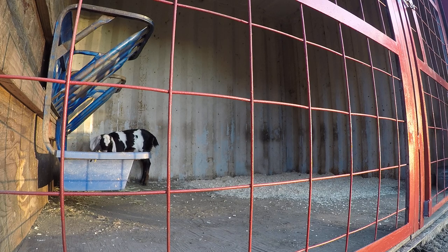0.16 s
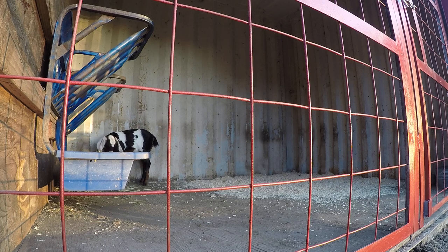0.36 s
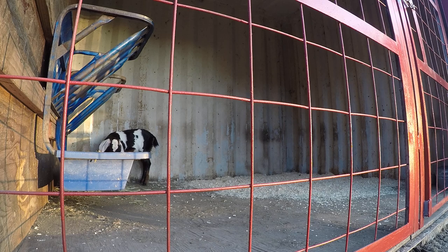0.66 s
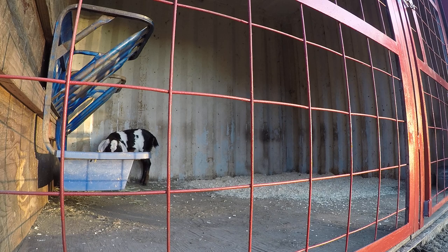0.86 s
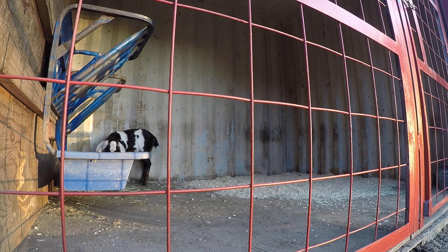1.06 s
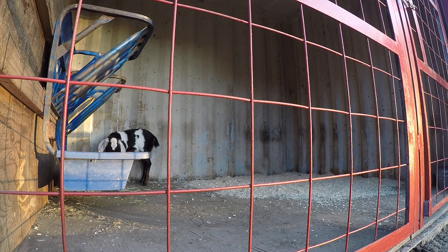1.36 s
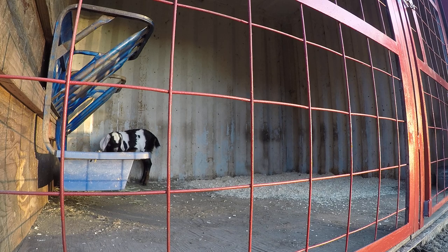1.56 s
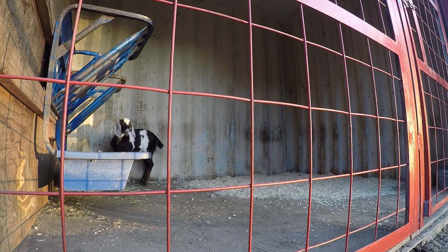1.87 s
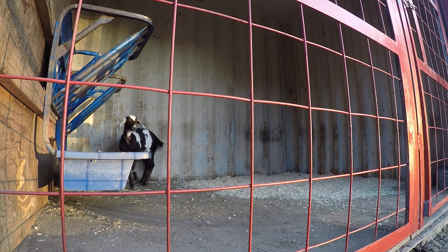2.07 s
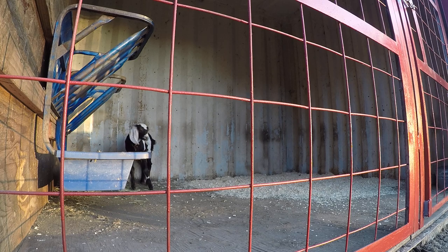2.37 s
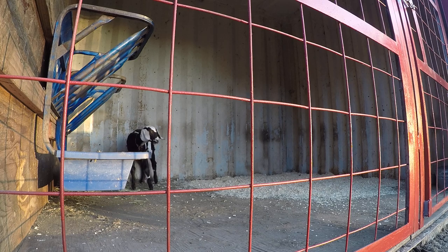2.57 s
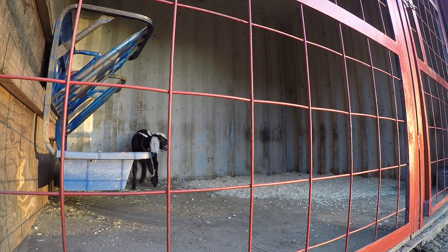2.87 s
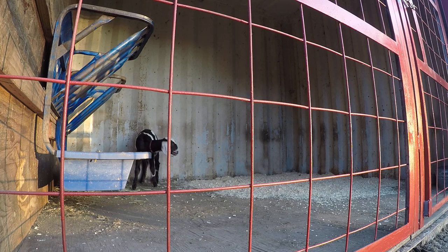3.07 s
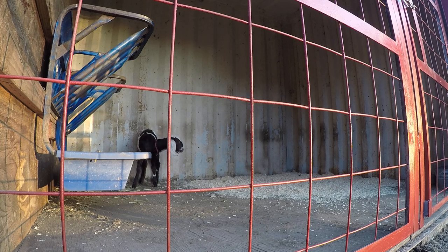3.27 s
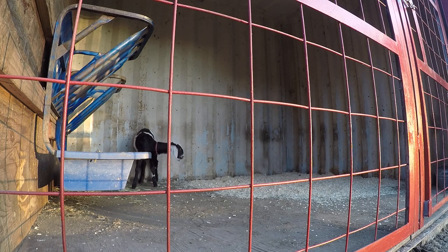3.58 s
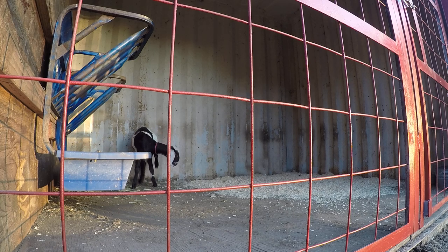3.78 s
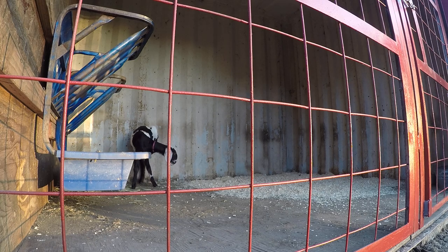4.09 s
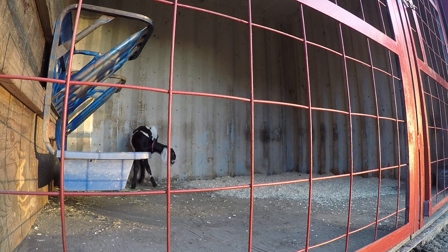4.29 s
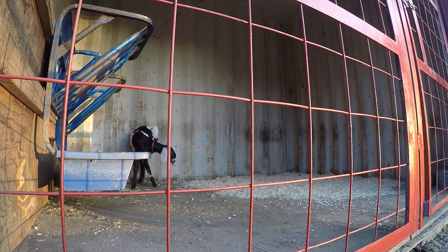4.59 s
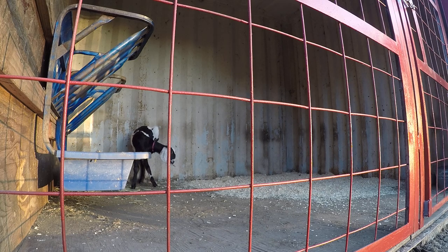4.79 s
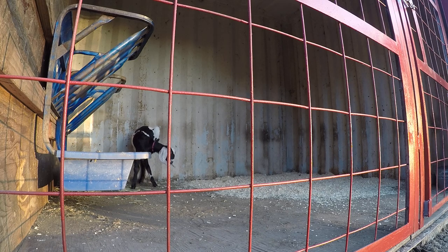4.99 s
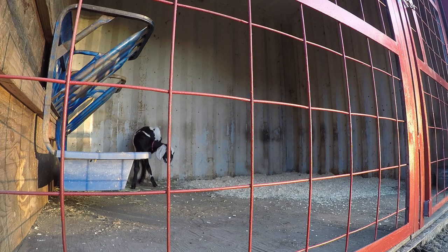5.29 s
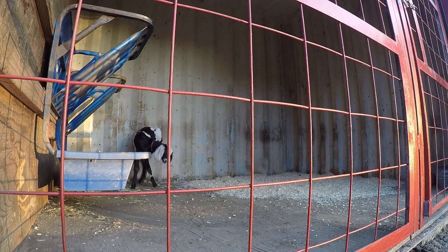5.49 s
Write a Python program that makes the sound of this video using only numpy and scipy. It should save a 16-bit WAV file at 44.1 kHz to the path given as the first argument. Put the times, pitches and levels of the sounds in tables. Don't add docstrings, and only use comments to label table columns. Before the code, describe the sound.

A young goat bleats once, loud and hoarse-ended, in a ringing metal shed after a hollow plastic knock, with faint birds and wind around.

```python
import sys
import numpy as np
from scipy import signal
from scipy.io import wavfile
from scipy.ndimage import uniform_filter1d

SR = 44100
rng = np.random.default_rng(int(sys.argv[2]) if len(sys.argv) > 2 else 0)


def makeup_ratio(level_db):
    decades = np.asarray(level_db, float) / 20
    return 10 ** decades


def wav_record(signal):
    frames = np.transpose(np.atleast_2d(signal))
    bounded = np.clip(frames, -1, 1)
    quanta = np.round(bounded * 32767).astype(np.int16)
    wavfile.write(sys.argv[1], SR, quanta)


N = 249165
T = np.arange(N) / SR


def level(x, db):
    return x * makeup_ratio(db) / np.sqrt(np.mean(x ** 2))


def band(x, lo_hz, hi_hz):
    return signal.sosfilt(signal.butter(2, [lo_hz, min(hi_hz, .45 * SR)], "band", fs=SR, output="sos"), x)


def walk(rate_hz, count=N):
    k = max(int(SR / rate_hz), 1)
    return level(uniform_filter1d(uniform_filter1d(rng.standard_normal(count), k), k), 0)


def tone(hz):
    return np.sin(2 * np.pi * np.cumsum(hz) / SR)


def note(start_s, length_s, attack_s, release_s):
    span = slice(int(start_s * SR), int((start_s + length_s) * SR))
    t = T[span] - start_s
    edge = np.clip(np.minimum(t / attack_s, (length_s - t) / release_s), 0, 1)
    return span, t, np.sin(np.pi / 2 * edge) ** 2


def tail(t60_s, length_s=1.4):
    t = np.arange(int(length_s * SR)) / SR
    x = rng.standard_normal(len(t)) * makeup_ratio(-60 * t / t60_s)
    return x / np.sqrt(np.sum(x ** 2))


def modes_sum(modes, t):
    return sum(makeup_ratio(db - 60 * t / t60_s) * np.sin(2 * np.pi * hz * t) for hz, db, t60_s in modes)


def ring(modes, rise_s):
    t = np.arange(SR // 2) / SR
    x = modes_sum(modes, t) * (1 - np.exp(-(t / rise_s) ** 2))
    return x / np.abs(x).max()


def place(starts_s, db, sound):
    out = np.zeros(N + len(sound))
    for s, gain in zip(starts_s, makeup_ratio(np.asarray(db))):
        first = int(s * SR)
        out[first:first + len(sound)] += gain * sound
    return out[:N]


def kid():
    # start_s, effort_db, opening_0_1
    bleat = [(2.476, -31, 1.), (2.52, -18.5, 0.58), (2.6, -8, 0), (2.645, -10.5, 0.4), (2.69, 0.5, 1),
             (2.82, 0.5, 0.96), (3.216, -1.5, 0.74), (3.356, -22.5, 0.76), (3.42, -34, 0)]
    # start_s, roughness_0_1
    hoarse = [(2.55, .6), (2.66, .08), (2.76, .11), (2.88, .05), (3.05, .05), (3.17, .1), (3.23, .25),
              (3.29, .4), (3.33, 1.)]
    # start_s, pitch_hz
    pitch = [(2.575, 504.1), (2.62, 515), (2.7, 553.6), (2.755, 519.3), (2.9, 570.7), (2.996, 546.6),
             (3.05, 553.2), (3.255, 490.9), (3.325, 406)]
    # start_s, resonance_hz
    mouth = [(2.47, 3030), (2.62, 3160), (2.75, 3270), (2.9, 3250), (3.0, 3870), (3.101, 3634),
             (3.22, 3320), (3.42, 3270)]
    # freq_hz, level_db
    throat = [(1100, -22), (1480, -2.5), (1620, -5.5), (1690, -16.5), (2200, -10), (2700, -11.5),
              (3300, -12.5), (4300, -13.5), (5600, -5), (6600, -9.5), (7800, -22), (8600, -40),
              (11500, -36), (14000, -55)]
    # full_effort_db, effort_share, pinch_db, tiring_db_per_s
    first = (-34.5, 0.11, 4, -12.5)
    second = (-15.5, 0.7, -18, -0.35)
    mouth_band = (-25.5, 1.08, 1.3, -1.6)
    top_band = (-38, 1.2, -6.5, -2)

    s, effort_db, opening = np.transpose(bleat)
    span, t, gate = note(s[0], s[-1] - s[0], .007, .03)
    now = T[span]
    n = len(now)
    effort_db = np.interp(now, s, effort_db)
    pinch = 1 - np.interp(now, s, opening)

    def drive_db(full_db, share, pinch_db, tiring_db_s):
        return full_db + share * effort_db + pinch_db * pinch + tiring_db_s * t

    first_db, second_db = drive_db(*first), drive_db(*second)
    mouth_db, top_db = drive_db(*mouth_band), drive_db(*top_band)
    hz, rough, mouth_hz = (np.interp(now, *np.transpose(curve)) for curve in (pitch, hoarse, mouth))
    hz = hz * np.interp(now, [2.49, 2.572], [.65, 1])
    jitter = .03 * walk(60, count=n) + .037 * walk(300, count=n)
    phase = 2 * np.pi * np.cumsum(hz * (1 + rough * jitter)) / SR

    throat_hz, throat_db = np.transpose(throat)
    flare_s, flare_length_s, flare_hz, flare_db = 2.75, .06, 5750, 8
    voice = makeup_ratio(first_db) * np.sin(phase) + makeup_ratio(second_db) * np.sin(2 * phase)
    for k in range(3, 28):
        f = np.log(k * hz)
        lean_db = np.interp(f, np.log([1100, 2600]), [.45, 0]) * (second_db - mouth_db - 6.5)
        lean_db = lean_db + np.interp(f, np.log([4000, 5200]), [0, 1]) * (top_db - mouth_db)
        open_db = 10 * np.exp(-((k * hz - mouth_hz) / 450) ** 2)
        flare_shape = ((k * hz - flare_hz) / 600) ** 2 + ((now - flare_s) / flare_length_s) ** 2
        open_db = open_db + flare_db * np.exp(-flare_shape)
        shimmer_db = (2.1 + .2 * k) * walk(25, count=n)
        partial_db = mouth_db + lean_db + open_db + np.interp(f, np.log(throat_hz), throat_db) + shimmer_db
        voice += makeup_ratio(partial_db) * np.sin(k * phase + .24 * k * k)
    voice *= np.sqrt(2 - 1.9 * rough ** 2) * (1 + .18 * rough * walk(200, count=n))

    puff = rng.standard_normal(n) * (1 + .403 * np.cos(phase))
    leak = makeup_ratio(first_db - 5.5) * level(band(puff, 260, 530), 0)
    leak += makeup_ratio(second_db - 3) * level(band(band(puff, 900, 1550), 850, 1650), 0)
    leak += makeup_ratio(mouth_db - 9) * level(band(puff, 2600, 4400), 0)
    leak += makeup_ratio(top_db - 7) * level(band(band(puff, 4600, 7600), 4300, 8000), 0)
    breath = makeup_ratio(mouth_db - 22.5 + 4.7 * rough) * level(band(band(puff, 1100, 1800), 1100, 7000), 0)
    hiss = makeup_ratio(top_db - 20) * level(band(band(puff, 4400, 7400), 4200, 7800), 0)
    creak = 1 + .25 * rough * np.cos(phase / 7)
    return place([s[0]], [0], gate * creak * (voice + rough ** 2 * leak + breath + hiss))


def hooves():
    # start_s, crack_db, trough_db
    knocks = [(1.836, -58, -45), (2.132, -33, -21.5), (2.149, -69, -41), (2.247, -55, -41),
              (2.294, -45.5, -37), (2.619, -36.5, -56), (3.466, -61, -46), (4.032, -60.5, -51),
              (4.108, -68, -54), (4.789, -62, -58.5)]
    # freq_hz, level_db, t60_s
    horn = [(1390, -3, 0.009), (1990, 0.5, 0.015), (2590, -3, 0.009), (3232, -2.5, 0.008)]
    # freq_hz, level_db, t60_s
    trough = [(227.8, -2.5, .06), (315, 3.5, 0.093), (435, -1, 0.12), (480, 6.5, 0.037), (655, 3.5, 0.037),
              (920, -4.5, 0.016)]
    s, crack_db, trough_db = np.transpose(knocks)
    grit = band(band(tail(.23, .5), 1000, 6000), 711, 6870)
    scrape = band(tail(.063, .5), 170, 1500)
    crack = ring(horn, .0015) + .17 * grit / np.abs(grit).max()
    hollow = ring(trough, .001443) + .39 * scrape / np.abs(scrape).max()
    return place(s, crack_db + 7, crack) + place(s, trough_db + .5, hollow)


def ticks():
    # start_s, level_db, centre_hz
    rustles = [(2.404, -69.5, 6410), (2.612, -60, 5680), (3.465, -71, 6416)]
    count = int(.03 * SR)
    puff = rng.standard_normal(count) * np.hanning(count)
    out = np.zeros(N)
    for s, db, hz in rustles:
        lo_hz, hi_hz = hz / 1.3, hz * 1.3
        out += place([s], [db], level(band(band(puff, lo_hz, hi_hz), lo_hz, hi_hz), 0))
    return out


def shed(x):
    # freq_hz, level_db, t60_s
    standing = [(1105, -55, 0.36), (1071, -68, 0.61), (1696, -58.5, 0.45), (2265, -61, 0.18),
                (3746, -64, 0.1)]
    # freq_hz, level_db, t60_s
    long_hum = [(1094, -109, 3.2), (1099, -109, 3.2), (1113, -107, 3.2), (1142, -108, 2.5)]
    low = band(tail(.42), 120, 2000)
    high = makeup_ratio(3.5) * band(tail(.26), 2000, 16700)
    t = np.arange(len(low)) / SR
    yard = makeup_ratio(-32) * tail(.65)
    reply = makeup_ratio(-4) * (low + high) + modes_sum(standing + long_hum, t) + yard
    first_trip = np.zeros(int(.009 * SR))
    return x + signal.fftconvolve(x, np.r_[first_trip, reply])[:N]


def thuds():
    # start_s, level_db, freq_hz, t60_s
    swings = [(1.841, -30.5, 99, 0.087), (1.87, -35.5, 37.2, 1), (1.9, -32.5, 67.3, 0.17),
              (1.858, -43, 166.4, 0.29), (1.848, -53.5, 378, 0.35), (2.141, -28, 117, 0.25),
              (2.164, -17.5, 36, 0.2), (2.301, -42, 45.5, 0.56), (2.299, -42, 234, 0.14),
              (2.818, -52.5, 267, 0.11), (3.473, -37, 37.5, 0.33), (3.48, -39.5, 110, 0.21),
              (4.04, -54.5, 220, 0.19)]
    return sum(place([s], [db], ring([(hz, 0, t60_s)], .0064)) for s, db, hz, t60_s in swings)


def buzzes():
    # start_s, last_hz, fall_hz, level_db, first_fray_0_1
    calls = [(0.527, 3950, 860, -51.5, 0.19), (4.335, 4080, 620, -59.5, .8)]
    out = np.zeros(N)
    for s, last_hz, fall_hz, db, first_fray in calls:
        span, t, gate = note(s, .85, .022, .17)
        hz = last_hz + fall_hz * (.453 * np.exp(-t / .01515) + np.exp(-t / .37))
        fray = np.clip(t / .252, first_fray, 1)
        thin = tone(hz + fray * 190 * walk(407, count=len(hz)))
        rasp = tone(hz - 300 + 400 * walk(1000, count=len(hz)))
        fade_db = 11 * (1 - np.exp(-t / .21))
        out[span] += gate * makeup_ratio(db - fade_db) * (thin + .75 * fray * rasp)
    return out


def peeps():
    # start_s, length_s, pitch_hz, level_db
    calls = [(.44, 0.32, 3200, -53.5), (4.277, 0.14, 3040, -65.5)]
    flick_hz, sag_hz_s, fade_db_s = 220, 150, 92
    out = np.zeros(N)
    for s, length_s, hz, db in calls:
        span, t, gate = note(s, length_s, .052, .03)
        hz = hz + flick_hz * np.exp(-t / .0236) - sag_hz_s * t + 8 * walk(76, count=len(t))
        out[span] += gate * makeup_ratio(db - fade_db_s * t) * tone(hz)
    return out


def whistles():
    # start_s, length_s, top_hz, level_db
    calls = [(0.881, 0.31, 1980, -69), (4.57, 0.22, 2000, -73.5)]
    dip_hz, rise_s, step_share = 180, .05, .68
    out = np.zeros(N)
    for s, length_s, top_hz, db in calls:
        span, t, gate = note(s, length_s, .04, .024)
        step_down = np.clip((t / length_s - step_share) / .123, 0, 1)
        hz = top_hz - dip_hz * (np.exp(-(t / rise_s) ** 2) + step_down)
        out[span] += gate * makeup_ratio(db) * tone(hz + 25 * walk(70, count=len(hz)))
    return out


def chips():
    # time_s (8 ms after the start), level_db (7 dB above the amplitude)
    calls = [(4.2494, -54), (4.4538, -45), (4.6544, -43), (4.8606, -43), (5.0666, -46), (5.2704, -41.5),
             (5.4805, -41)]
    t = np.arange(int(.037 * SR)) / SR
    out = np.zeros(N)
    for s, db in calls:
        chip = tone(6000 * np.exp(-t / .082) + 850 * walk(1500, count=len(t)))
        chip = chip + .28 * (chip ** 2 - .5)
        out += place([s - .008], [db - 7], np.hanning(len(t)) * chip)
    return out


def birds():
    calls = buzzes() + peeps() + whistles() + chips()
    return .63 * calls + .73 * signal.fftconvolve(calls, tail(.31))[:N]


def wind():
    # peak_s, rise_s, fall_s, over_calm_db
    gusts = [(.74, .25, 0.059, 3.5), (1.1, .12, 0.5, 2), (2.03, .1, .04, 17.5), (2.19, .06, 0.27, 16.5),
             (2.75, .15, 0.07, 6.5), (3.599, .4, .25, 2), (5.25, .4, 0.18, 4)]
    # freq_hz, density_db_per_hz
    spectrum = [(12, -28), (20, 1.5), (76, -7), (103, -18.5), (136, -13), (165, -19.5), (206, -23),
                (800, -32.5), (3110, -38), (4110, -34), (5130, -38.5), (8450, -44), (9180, -42),
                (15100, -52)]
    gust_db = sum(db * np.exp(-((T - s) / np.where(T < s, rise_s, fall_s)) ** 2)
                  for s, rise_s, fall_s, db in gusts)
    flicker = walk(15)
    air_hz, air_db = np.transpose(spectrum)
    out = np.zeros(N)
    for hz in 22 * 2 ** np.arange(0, 9.6, .5):
        db = np.interp(np.log(hz), np.log(air_hz), air_db) + 10 * np.log10(hz)
        windy = np.clip(1 - np.log2(hz / 60) / 2, 0, 1)
        db = db + windy * (gust_db - gust_db.mean() + 1.18 * flicker)
        db = db + .5 * np.roll(flicker, int(hz * 9))
        out += makeup_ratio(db) * level(band(rng.standard_normal(N), hz / 1.213, hz * 1.186), 0)
    return level(out, -49)


def insects():
    low = makeup_ratio(-73 + 3.8 * walk(3)) * level(band(rng.standard_normal(N), 3950, 4300), 0)
    high = makeup_ratio(-78 + 1.5 * walk(2.5)) * level(band(rng.standard_normal(N), 5500, 6600), 0)
    return low + high


def electronics():
    # freq_hz, level_db
    lines = [(8631, -79.5), (8330, -86.5)]
    return sum(makeup_ratio(db + 4) * np.sin(2 * np.pi * hz * T) for hz, db in lines)


def scene():
    inside = shed(makeup_ratio(-1.5) * kid() + hooves() + ticks())
    return (inside + thuds() + birds() + wind() + insects() + electronics())[None]


def low_pass(x):
    return signal.sosfilt(signal.butter(12, 15280, fs=SR, output="sos"), x)


def record(dry):
    mix = np.tanh(.9 * dry) / .9
    return low_pass(mix)


dry = scene()
out = record(dry)
wav_record(out)
```